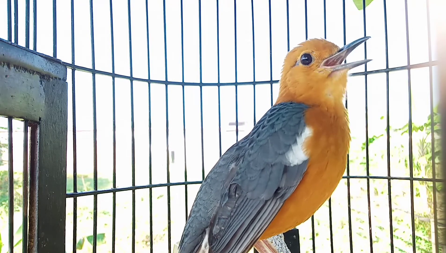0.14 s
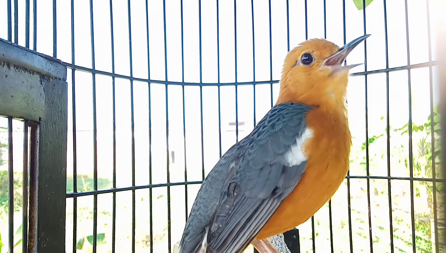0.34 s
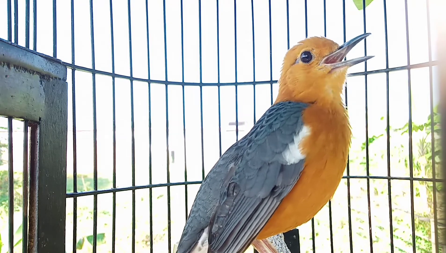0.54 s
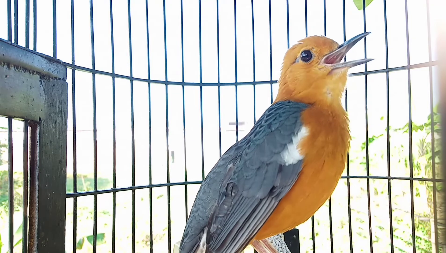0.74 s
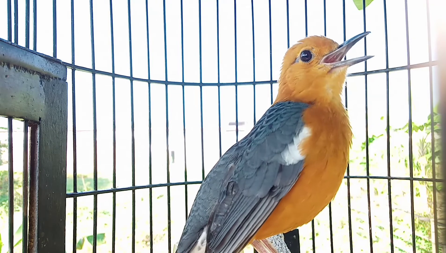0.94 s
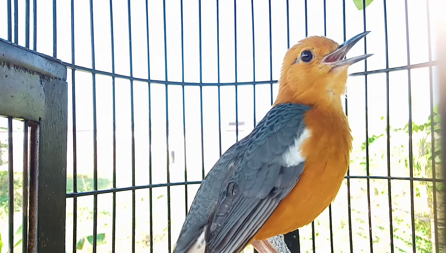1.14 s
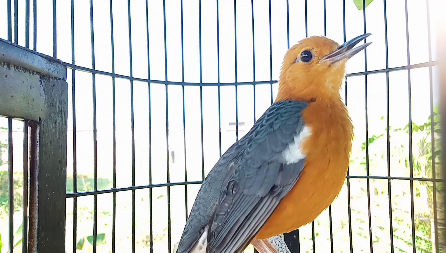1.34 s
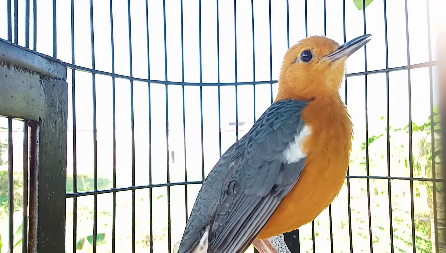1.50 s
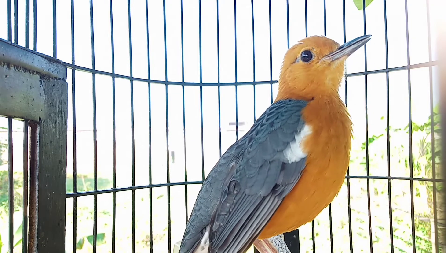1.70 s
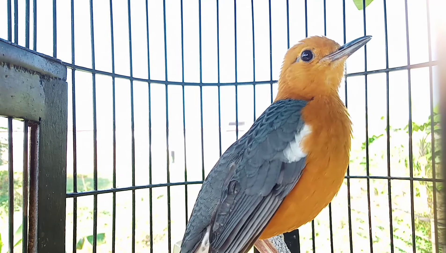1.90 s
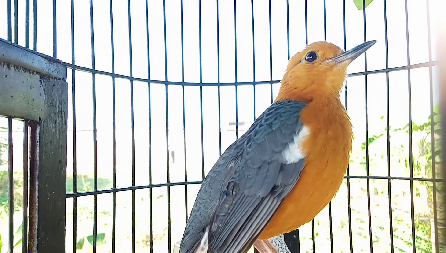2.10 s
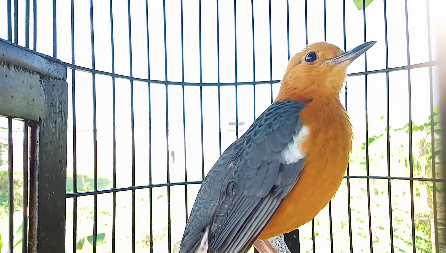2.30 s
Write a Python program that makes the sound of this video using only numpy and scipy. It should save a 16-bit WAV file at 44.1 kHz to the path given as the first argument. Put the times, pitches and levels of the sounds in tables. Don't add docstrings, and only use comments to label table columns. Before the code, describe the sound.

A caged thrush close to the microphone whistles five loud, clear gliding notes with faint echoes; afterwards a cricket ticks steadily over soft garden rumble and hiss, with one very faint distant dove coo.

```python
import sys
import numpy as np
from scipy import signal
from scipy.fft import rfft, irfft
from scipy.io import wavfile
from scipy.ndimage import uniform_filter1d

SR = 44100
rng = np.random.default_rng(int(sys.argv[2]) if len(sys.argv) > 2 else 0)


def rack_gain(trim_db):
    fader = np.asarray(trim_db, float)
    return 10 ** (fader / 20)


def dump(signal):
    limited = np.clip(np.atleast_2d(signal).T, -1, 1)
    pcm = np.round(limited * 32767).astype(np.int16)
    wavfile.write(sys.argv[1], SR, pcm)


N = 103635
T = np.arange(N) / SR


def evened(x):
    return x / np.sqrt(np.mean(x ** 2) + 1e-20)


def coloured(x, points):
    hz, db = np.transpose(points)
    grid_hz = np.fft.rfftfreq(N, 1 / SR)
    gain_db = np.interp(np.log(grid_hz + 1), np.log(hz), db)
    return irfft(rfft(x) * rack_gain(gain_db), N)


def drift(size):
    once = uniform_filter1d(rng.standard_normal(N), size)
    return evened(uniform_filter1d(once, size))


def window(start, length, edge):
    to_nearest_end = np.minimum(T - start, start + length - T)
    return np.sin(np.pi / 2 * np.clip(to_nearest_end / edge, 0, 1)) ** 2


def resonate(x, hz, width):
    turn = np.exp(2j * np.pi * hz * T)
    r = np.exp(-np.pi * width / SR)
    return 2 * (turn * signal.lfilter([1 - r], [1, -r], x / turn)).real


def bursts(rows):
    noise = rfft(rng.standard_normal(N))
    hz = np.fft.rfftfreq(N, 1 / SR)
    out = np.zeros(N)
    for s, d, db, f, width in rows:
        puff = irfft(noise / (1 + (2 * (hz - f) / width) ** 2), N)
        out += rack_gain(db) * window(s, d, d / 3) * evened(puff)
    return out


def second_side():
    # t/s, length/s, offset f/Hz, level/dB
    beats = [
        (0.1062, .006, 599, -0.5),
        (0.28, .012, -300, -8),
        (.368, 0.037, 210, -10),
        (0.623, 0.022, 230.5, -2.5),
        (0.713, 0.019, 621, -11),
        (1.113, 0.055, -220, -12),
    ]
    beat = np.zeros(N, complex)
    for s, d, hz, db in beats:
        offset_hz = hz * (1 + 0.22 * drift(size=150))
        beat += rack_gain(db) * window(s, d, d / 4) * np.exp(2j * np.pi * np.cumsum(offset_hz) / SR)
    return beat


def beak_breaks():
    # t/s, length/s, level/dB
    breaks = [
        [(.472, .02, -18.5), (.77, 0.025, 10.5), (.81, 0.0082, -9), (.915, 0.043, 6), (1.05, 0.0077, -13.5),
         (1.068, 0.016, -6), (1.104, .01, -3), (1.158, 0.013, -14)],
        [(.77, 0.023, -15), (1.01, .012, -6)],
        [(.345, 0.042, 9), (.42, 0.011, -12), (.48, .014, -15), (.615, .014, -14.5), (.77, .02, -13),
         (1.022, .03, 10), (1.104, .012, -14.5), (1.162, 0.017, -13.5)],
        [(.13, .035, -17), (.375, .05, -18), (.615, 0.033, -15.5), (.8, .022, -13.5), (1.066, .05, -18.5),
         (1.132, 0.037, 8.5)],
        [(.41, .018, -14.5), (.482, .03, -18), (.615, 0.027, -10.5), (.8, .058, -16.5), (.9, 0.029, 11)],
        [(.615, 0.017, -14.5), (.655, 0.011, -8), (.84, 0.027, -12), (.885, .05, 8)],
    ]
    out = []
    for rows in breaks:
        shimmer_db = 3 * drift(size=250)
        out.append(shimmer_db + sum(db * window(s, d, d / 4) for s, d, db in rows))
    return out


def thrush():
    # t/s, pitch f/Hz, effort level/dB, overtones level/dB, air level/dB
    rise = [(0.11, 2040, -45.5, -2, -25), (.123, 2357, -21.5, 1.5, -35.5), (0.148, 2406, -21, -3.5, -38.5),
            (0.164, 2651, -12.5, -4.5, -46.5), (0.206, 2786, -15.5, 4.5, -38.5),
            (0.22, 2913, -11.5, -1, -35.5), (0.276, 3011, -16, 4, -39), (0.28, 3160, -13, -11, -37.5),
            (0.295, 4000, -46, -11, -31)]
    dip = [(.345, 3627, -20, -3, -30), (0.358, 3675, -8, -7.5, -34), (.367, 3646, -7, -7.5, -41.5),
           (.378, 3198, -11.5, -3.5, -23), (.4, 2592, -14.5, -0.5, -41.5), (.44, 2353, -19, 1, -39),
           (0.488, 2611, -14.5, -5, -36.5), (0.521, 3011, -12, -10.5, -41), (0.539, 2900, -39.5, -20, -35)]
    low = [(.617, 1502, -43.5, 21.5, -17), (.626, 1960, -28, 6, -20), (0.641, 2165, -23, -4, -27),
           (.651, 2102, -19.5, -4, -38), (.677, 2046, -23.5, -6.5, -41), (.688, 2223, -14.5, -9, -43),
           (.708, 2106, -18.5, -7, -33), (.722, 1790, -33, 5.5, -24.5), (.73, 1640, -49.5, 13, -27.5)]
    fall = [(.771, 3640, -29, -13, -43), (.778, 3588, -14.5, -8, -51), (.792, 3430, -8.5, -8, -41),
            (.809, 2898, -7.5, -13.5, -36), (.84, 2736, -11, 0, -34.5), (.857, 2560, -12, -6.5, -43),
            (0.889, 2505, -18, -2.5, -32), (0.926, 2461, -19, -6.5, -34), (.938, 2376, -33, 6, -35.5)]
    fall_turn = [(1.011, 3842, -23.5, 4.5, -36.5), (1.019, 3603, -9, -12, -43),
                 (1.054, 3257, -7.5, -3.5, -46), (1.061, 3054, -8.5, -6, -37.5),
                 (1.099, 2750, -11.5, -2.5, -36), (1.116, 2996, -12, -11.5, -30.5),
                 (1.158, 2800, -15, -10, -30), (1.168, 2690, -11.5, -11, -33),
                 (1.181, 2376, -36, -2.5, -21)]
    overtone_levels = [
        (-23, -23, -30.5, -34.5, -50.5, -57),
        (-35, -31, -45.5, -39.5, -37, -50),
        (-37.5, -36, -43.5, -32, -37, -27.5),
        (-30, -23.5, -36, -42.5, -42, -47.5),
        (-28, -29, -36.5, -39.5, -49, -54),
    ]
    # centre t/s, half length/s, pitch shift f/Hz, level/dB, air level/dB
    flicks = [(.113, .003, -0.5, 3.5, 0), (0.269, 0.04, 15, -0.5, 4.5), (0.372, .012, -59, -0.5, 5),
              (0.42, .009, 170.5, 6.5, 0.5), (0.489, .005, 29.5, 3.5, 2.5), (0.4923, 0.0033, 59.5, -6, 0),
              (.501, .014, 161.5, 1, -3), (.519, 0.0039, 0, 3, 5), (0.528, 0.008, -60.5, -4.5, 0),
              (.791, 0.0049, -55.5, 0, 0), (0.804, .004, -30, -8, 3), (0.816, 0.0093, 35, -1, 1),
              (0.83, .012, -12, -2, 5.5), (0.924, 0.0055, -51, -3.5, -0.5), (1.017, 0.0032, 55, 2, -2.5),
              (1.028, .004, -31, 0, 2), (1.062, .004, -72, -5, 4), (1.074, .014, 39.5, -1.5, 8),
              (1.083, .004, 29, 0, -0.5), (1.091, .004, -50.5, -2.5, -3.5)]
    # f/Hz, level/dB
    air_band = [(1500, -31.5), (2300, -13.5), (3700, 1.5), (5000, -20.5), (6200, -15.5), (8000, -13),
                (11500, -26.5), (15000, -24)]
    # f/Hz, level/dB
    overtone_lift = [(2800, 28), (3800, 21), (4500, 2), (7000, 1), (8600, 7), (12000, -2), (14500, 3)]
    edge_s, wobble, shimmer_db = .004, .004, .5

    beat = second_side()
    break_db = beak_breaks()
    flick_hz, flick_db, puff_db = sum(np.outer(row, window(s - d, 2 * d, d)) for s, d, *row in flicks)
    air = evened(coloured(rng.standard_normal(N), air_band)) * rack_gain(2 * drift(size=120) + puff_db)
    out = np.zeros(N)
    for note, levels in zip((rise, dip, low, fall, fall_turn), overtone_levels):
        s, *cols = np.transpose(note)
        hz, effort_db, over_db, air_db = (uniform_filter1d(np.interp(T, s, c), size=130) for c in cols)
        hz = hz + flick_hz
        rough_hz = hz * (1 + wobble * (1 + 4 * abs(beat)) * drift(size=90))
        turn = np.exp(2j * np.pi * np.cumsum(rough_hz) / SR) * (1 + beat)
        tone = turn.real * rack_gain(shimmer_db * drift(size=90))
        for k, db in enumerate(levels, 2):
            lift_db = np.interp(k * hz, *np.transpose(overtone_lift)) + break_db[k - 2]
            overtone = (turn * (turn / abs(turn)) ** (k - 1)).real
            tone = tone + overtone * rack_gain(db + over_db + lift_db) * (k * hz < SR / 2.2)
        effort = window(s[0], s[-1] - s[0], edge_s) * rack_gain(effort_db + flick_db)
        out += effort * (np.sqrt(2) * tone + rack_gain(air_db) * air)
    return out


def beak_hiss():
    # t/s, length/s, level/dB, f/Hz, width/Hz
    hiss_bursts = [(.225, .062, -48, 8450, 3810), (.232, .052, -46, 13500, 5000),
                   (.372, .014, -41.5, 7500, 5000), (.512, .014, -51, 7560, 2900),
                   (.628, .022, -53, 14800, 1800), (.626, .022, -48, 3900, 700),
                   (.626, .022, -56, 7800, 900), (.815, .03, -49, 7000, 2990),
                   (.885, .045, -52.5, 14800, 1502), (1.068, .02, -46.5, 8160, 5000),
                   (1.106, .062, -48, 7820, 350)]
    return rack_gain(3.5 * drift(size=60)) * bursts(hiss_bursts)


def yard(x):
    # t/s, level/dB
    near_echoes = [
        (.0021, -27),
        (.0047, -27),
        (.0083, -28),
        (.045, -44),
        (.064, -46),
    ]
    tail_db, t60, gap_s, dull_hz = -44.5, .88, .02, 4500
    far_wall_s, far_wall_spread_s, far_wall_lift = .215, .025, .5

    t = T[:SR]
    fade = rack_gain(-60 * t / t60)
    far_wall = far_wall_lift * np.exp(-((t - far_wall_s) / far_wall_spread_s) ** 2)
    sparse = rng.standard_normal(SR) * (rng.random(SR) < .03)
    tail = sparse * (fade + far_wall) * (t > gap_s)
    near = sum(rack_gain(db) * (np.arange(SR) == round(s * SR)) for s, db in near_echoes)
    echoes = near + rack_gain(tail_db) * tail / np.linalg.norm(tail)
    echoes = signal.lfilter(*signal.butter(2, dull_hz, fs=SR), echoes)
    late = signal.fftconvolve(x, echoes * (t > gap_s))[:N]
    hollow = rack_gain(2) * resonate(late, hz=2960, width=240)
    return x + signal.fftconvolve(x, echoes)[:N] + hollow


def cricket():
    # t/s, level/dB
    strokes = [(0.0563, -51.5), (0.2994, -42.5), (0.3294, -45.5), (0.5576, -45), (0.5741, -51.5),
               (0.7526, -47), (0.9918, -43.5), (1.2001, -47.5), (1.256, -44.5), (1.3114, -46),
               (1.3616, -46.5), (1.4155, -45), (1.4665, -45), (1.521, -44), (1.572, -42.5), (1.6276, -43),
               (1.6802, -42.5), (1.7378, -43), (1.7932, -43), (1.8528, -43), (1.91, -44), (1.9701, -41.5),
               (2.0306, -42.5), (2.094, -45.5), (2.1619, -48), (2.2467, -45), (2.2701, -49)]
    # f/Hz, level/dB
    tick_colour = [(1500, -13.5), (2050, -8.5), (4100, -17), (5300, -17.5), (7600, 1), (11500, -17), (13800, -0.5),
                   (16000, -7)]
    stroke_s, stroke_db, stroke_t60, lag_s = .011, -8.5, 0.07, .0008
    first_db, second_db, second_s = -0.5, 0, .005
    teeth_per_s, chorus_db = 3600, -66

    u = T[:SR // 5]
    tail = .22 * rack_gain(-60 * abs(u - stroke_s) / stroke_t60)
    rasp = np.where(u < stroke_s, 1 - .6 * u / stroke_s, tail)
    sharp = rack_gain(first_db - 60 * u / 0.0045) + rack_gain(second_db - 60 * abs(u - second_s) / .005)
    s, db = np.transpose(strokes)
    starts = np.zeros(N)
    starts[np.round((s + lag_s) * SR).astype(int)] = rack_gain(db)
    level = signal.oaconvolve(starts, rasp + sharp)[:N]
    teeth = rng.standard_normal(N) * (1 + 1.7 * (rng.random(N) < teeth_per_s / SR))
    crowd = evened(resonate(rng.standard_normal(N), hz=5000, width=3000))
    chorus = rack_gain(chorus_db + 2.2 * drift(size=1200)) * crowd
    return coloured(evened(teeth) * (rack_gain(stroke_db) * level) + chorus, tick_colour)


def taps():
    # t/s, level/dB, f/Hz, t60/s
    knocks = [
        (0.0563, -52, 7400, 0.0067),
        (.061, -49.5, 2000, 0.008),
        (0.0618, -50, 3800, .006),
        (1.53, -65, 1100, .04),
        (2.0705, -55, 1200, 0.02),
        (2.248, -47.5, 2250, 0.00516),
        (2.2486, -59, 3330, .006),
        (2.28, -69.5, 2098, .15),
    ]
    out = np.zeros(N)
    for s, db, hz, t60 in knocks:
        out += rack_gain(db - 60 * abs(T - s) / t60) * (T > s) * np.sin(2 * np.pi * hz * (T - s))
    return out


def perch():
    # t/s, length/s, level/dB, f/Hz, width/Hz
    creaks = [
        (0., 0.067, -66.5, 1100, 800),
        (-.03, 0.091, -72, 3300, 1500),
        (.235, .036, -57, 780, 450),
        (.295, 0.035, -61, 790, 608.7),
        (.345, 0.0305, -60.5, 950, 160),
        (0.328, .2, -62, 598.5, 700),
        (.365, 0.034, -57, 150, 120),
        (.79, 0.036, -64, 180, 199.7),
        (1.1, 0.074, -59.5, 230, 270),
    ]
    return bursts(creaks)


def dove():
    # t/s, length/s, f/Hz, level/dB, half pitch level/dB
    coo = (1.96, .35, 548, -72, -72)
    s, d, hz, db, half_db = coo
    turns = np.cumsum(hz * (1 + 0.0061 * drift(size=2000))) / SR
    tone = rack_gain(db) * np.sin(2 * np.pi * turns) + rack_gain(half_db) * np.sin(np.pi * turns)
    return window(s, d, .03) * tone


def distant_rumble():
    # f/Hz, level/dB
    rumble_band = [(25, -10), (111, 0.5), (236, -2.5), (575, -15.5), (3600, -19), (5200, -31.5),
                   (9000, -25.5), (16000, -30.5)]
    return rack_gain(-66 + 1.6 * drift(size=1500)) * evened(coloured(rng.standard_normal(N), rumble_band))


def scene():
    bird = yard(thrush() + beak_hiss())
    return (bird + cricket() + taps() + perch() + dove() + distant_rumble())[None]


def band_limit(x):
    return signal.sosfilt(signal.butter(12, 16170, fs=SR, output="sos"), x)


def record(dry):
    treble_cut = signal.firwin(511, 16130, window=("kaiser", 9), fs=SR)
    x = signal.oaconvolve(dry, treble_cut[None], "same")
    x = signal.lfilter(*signal.butter(2, 55, "high", fs=SR), x)
    return band_limit(x)


dry = scene()
out = record(dry)
dump(out)
```